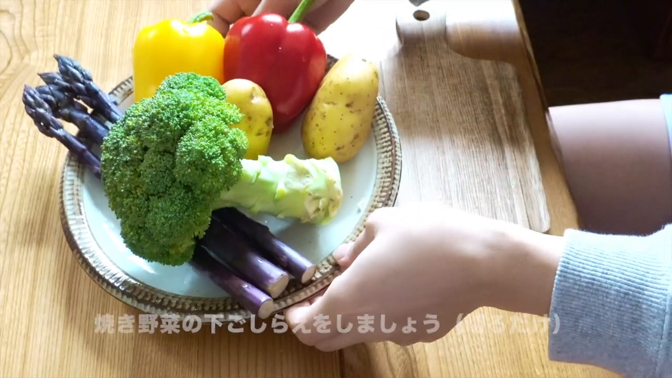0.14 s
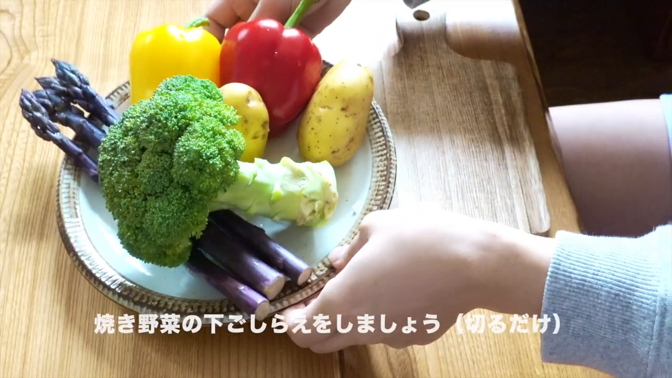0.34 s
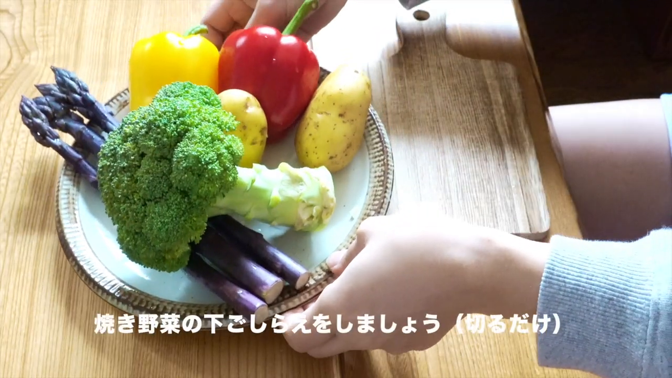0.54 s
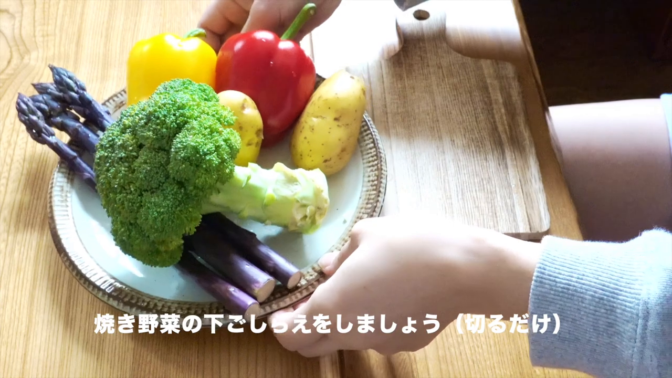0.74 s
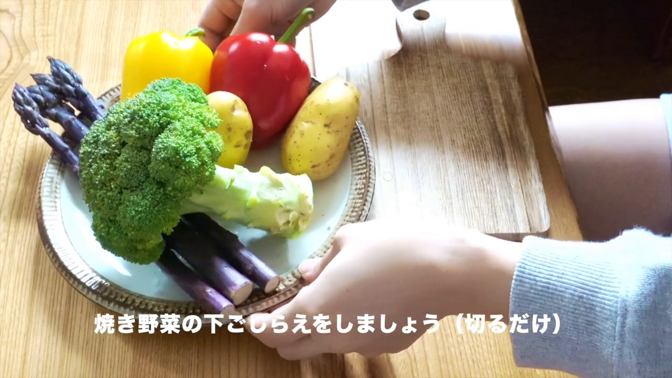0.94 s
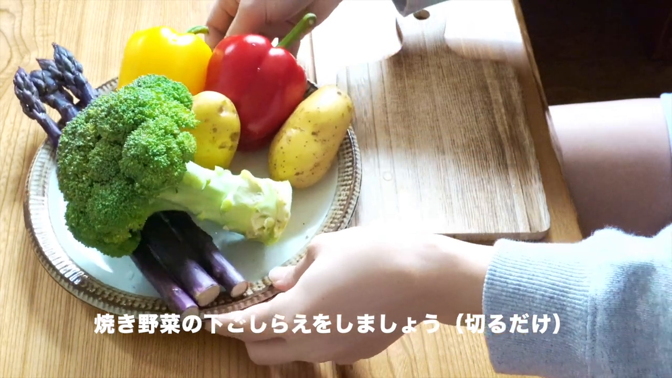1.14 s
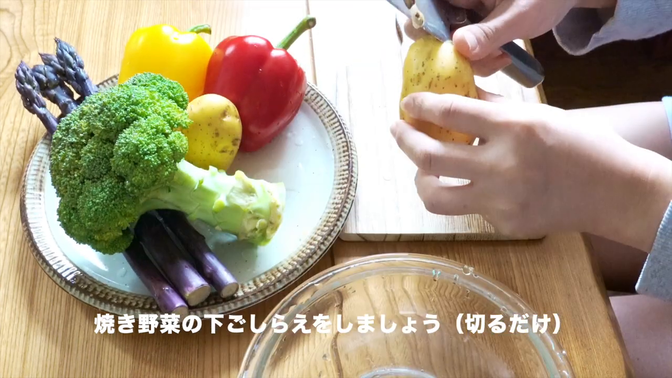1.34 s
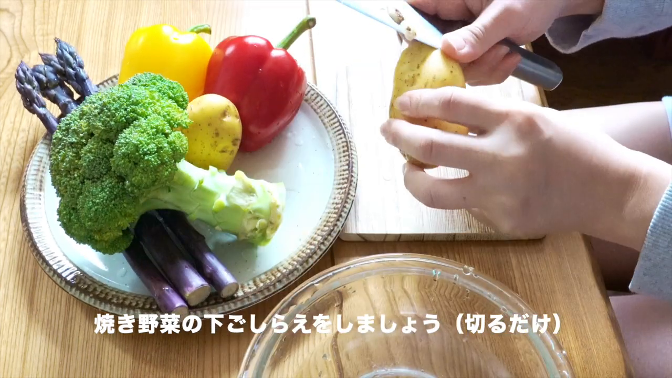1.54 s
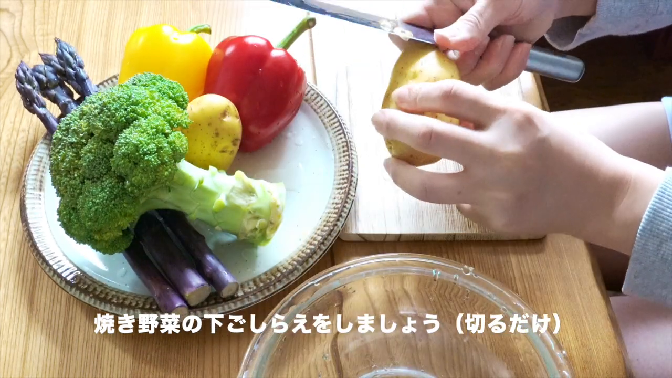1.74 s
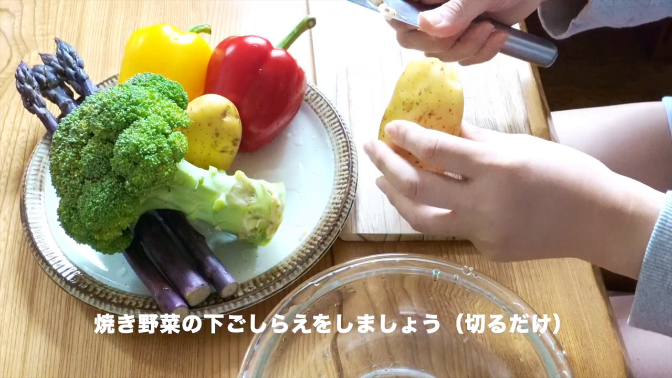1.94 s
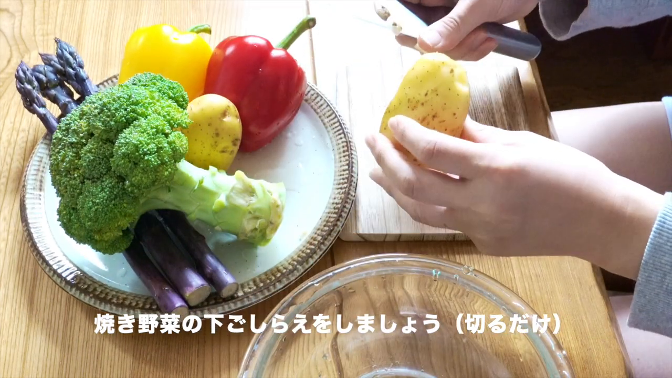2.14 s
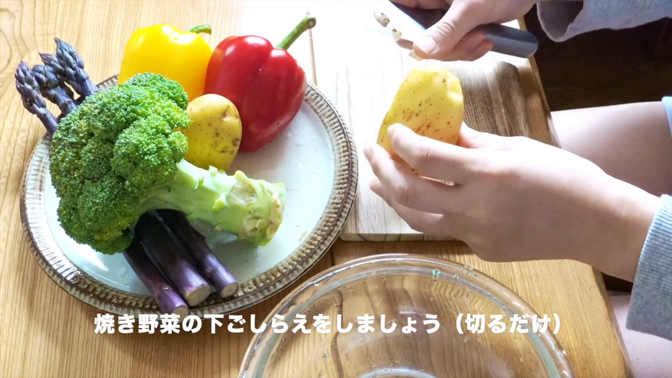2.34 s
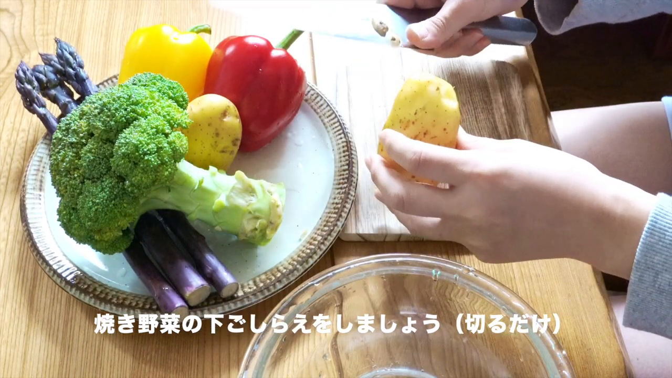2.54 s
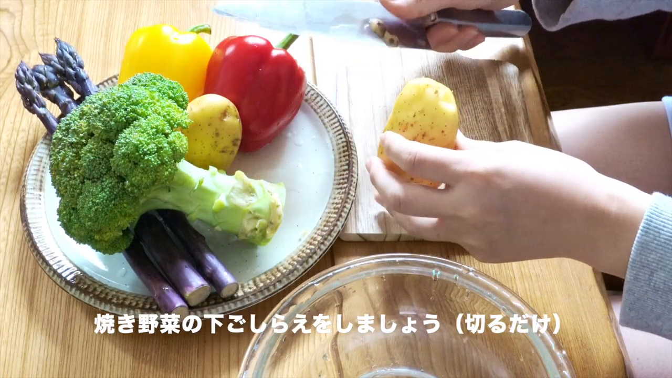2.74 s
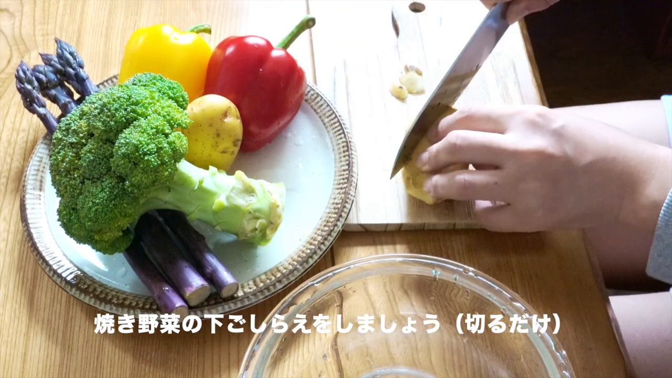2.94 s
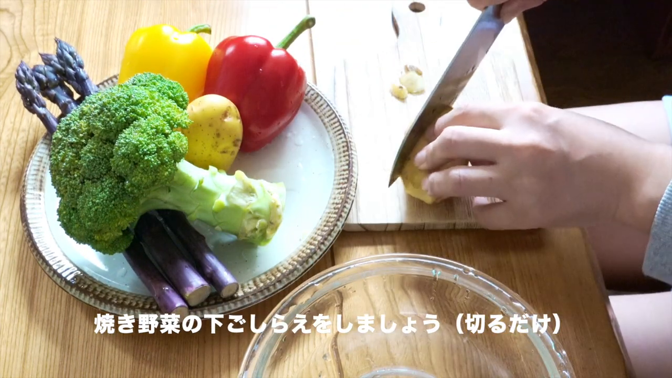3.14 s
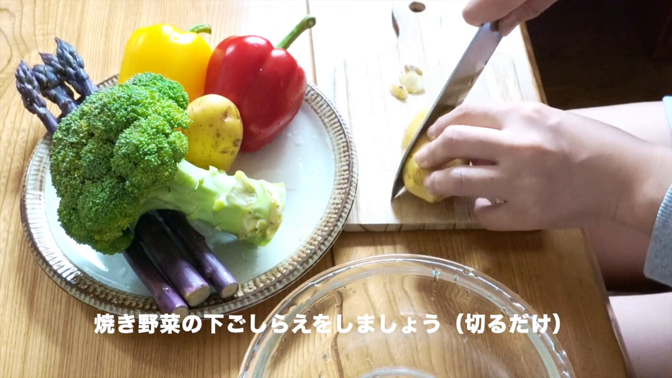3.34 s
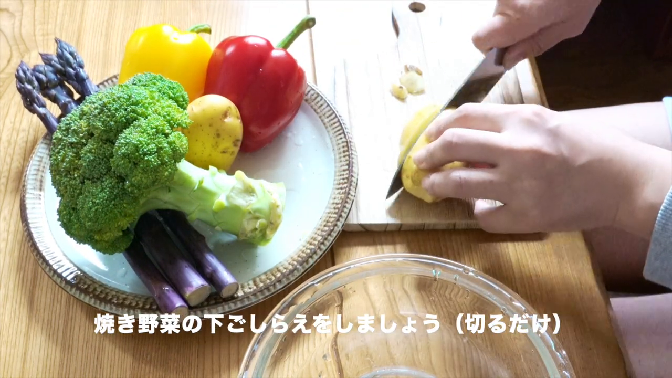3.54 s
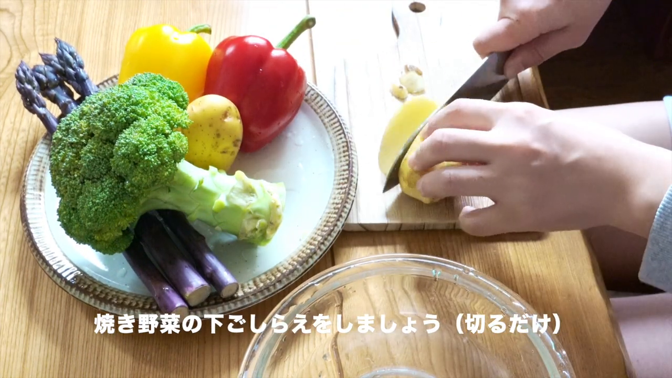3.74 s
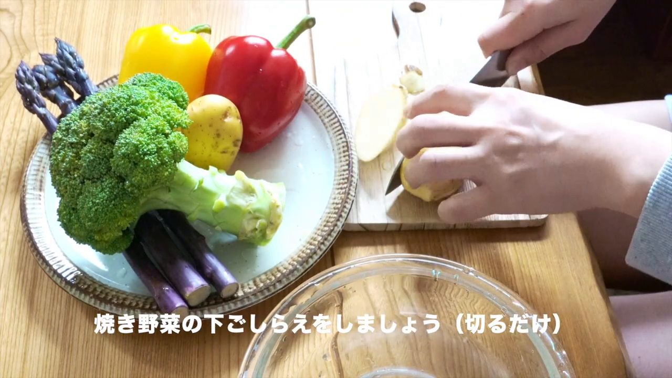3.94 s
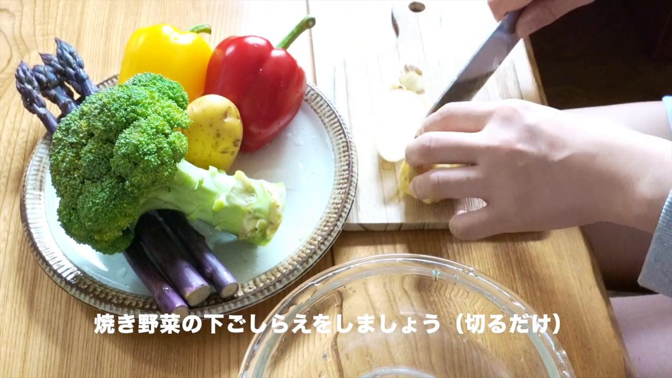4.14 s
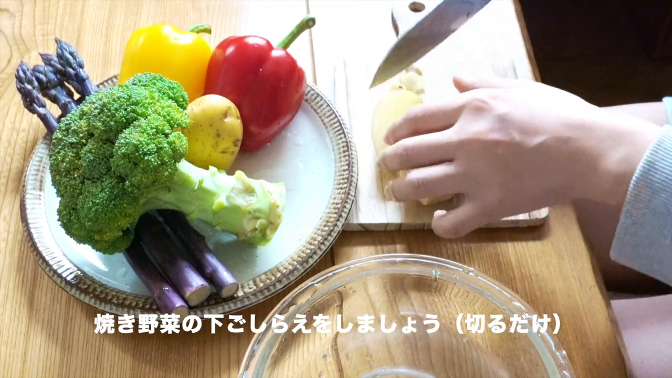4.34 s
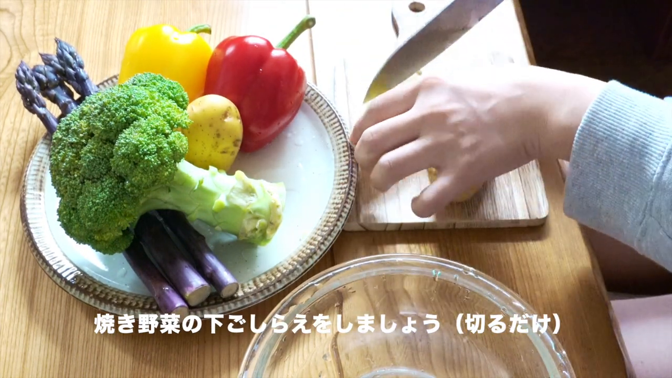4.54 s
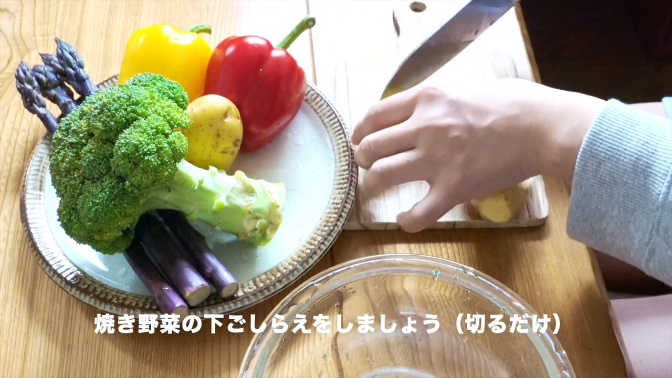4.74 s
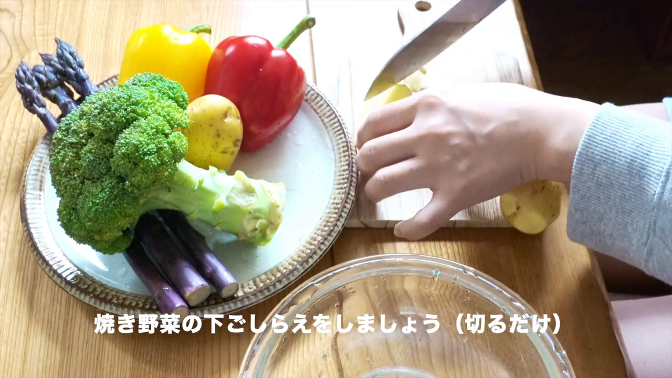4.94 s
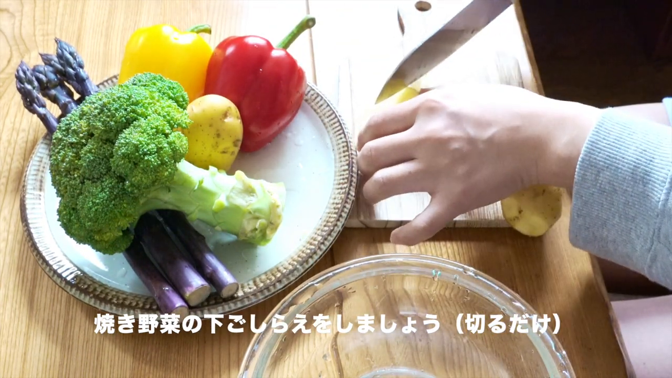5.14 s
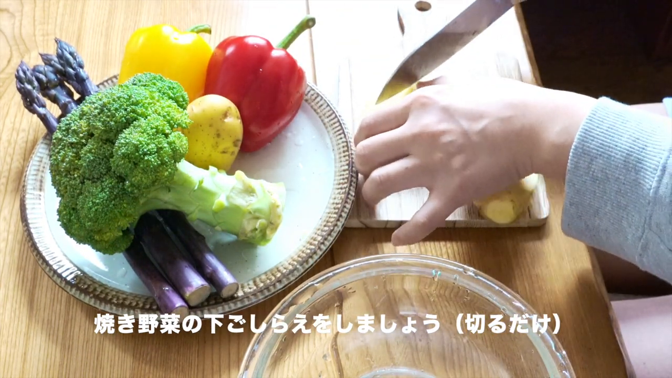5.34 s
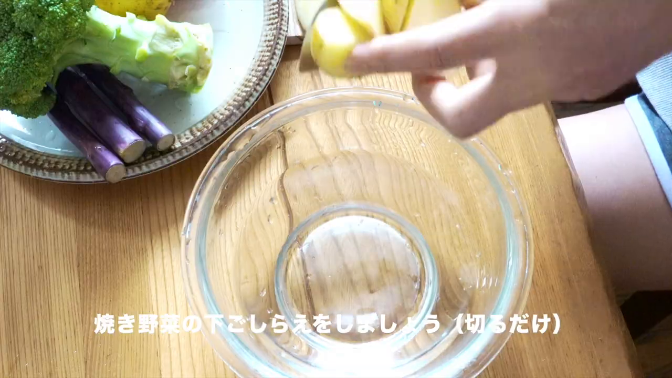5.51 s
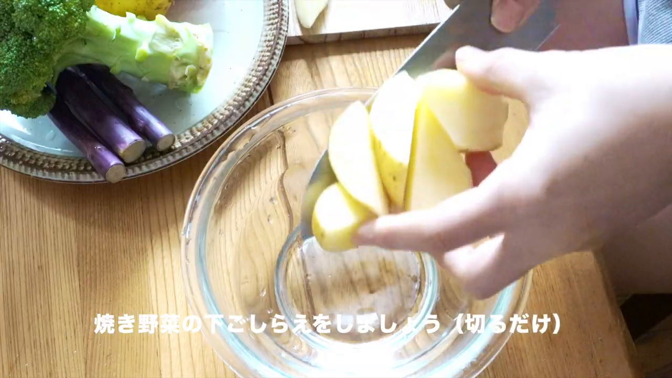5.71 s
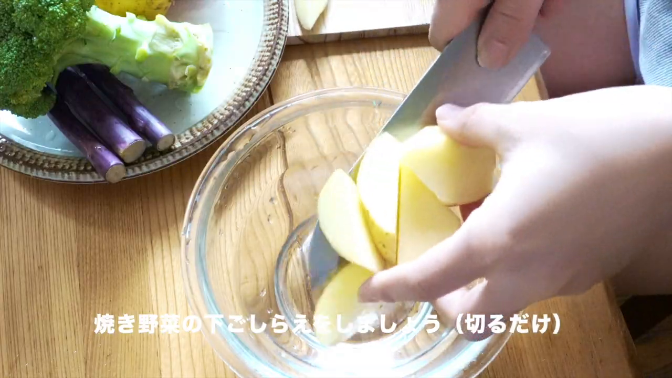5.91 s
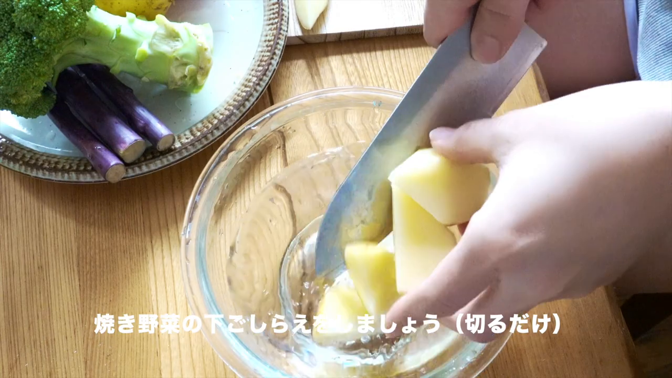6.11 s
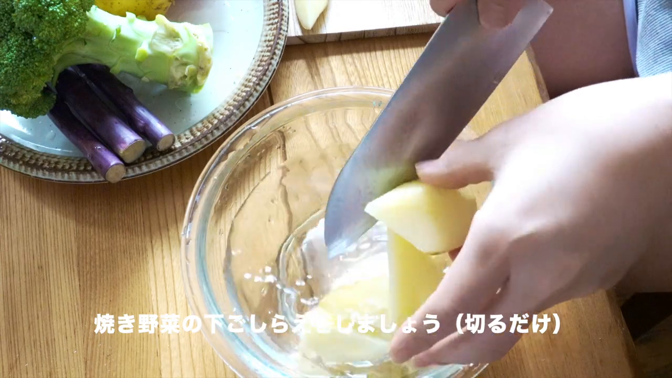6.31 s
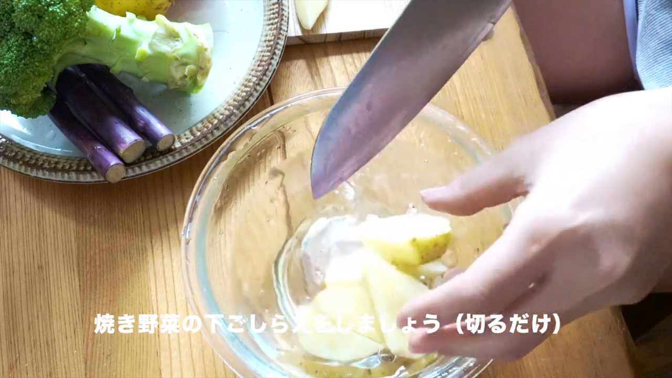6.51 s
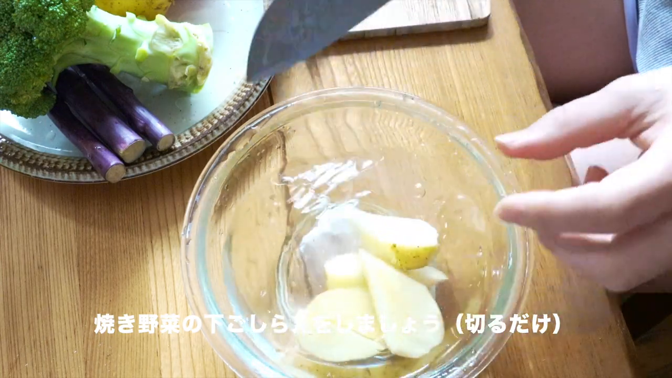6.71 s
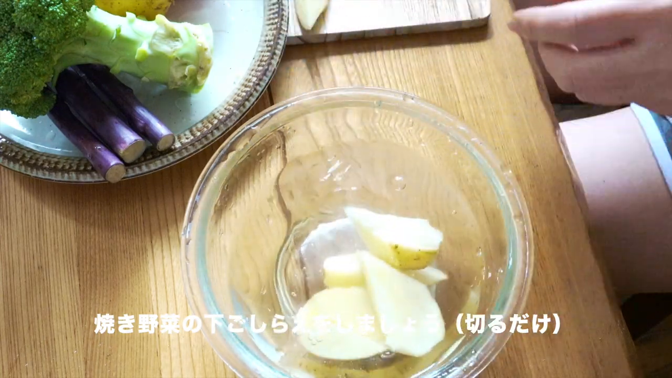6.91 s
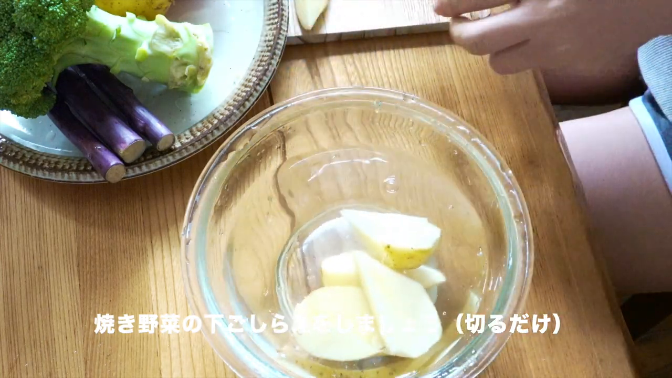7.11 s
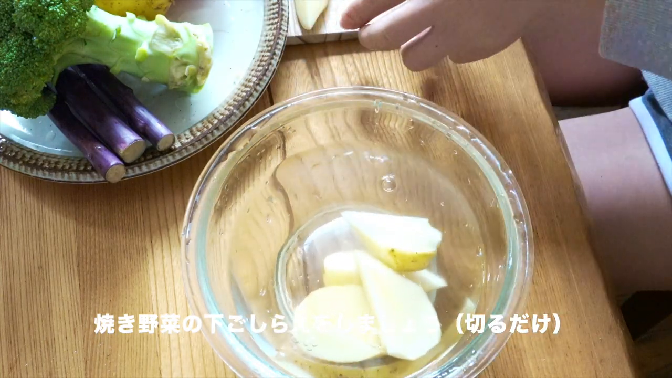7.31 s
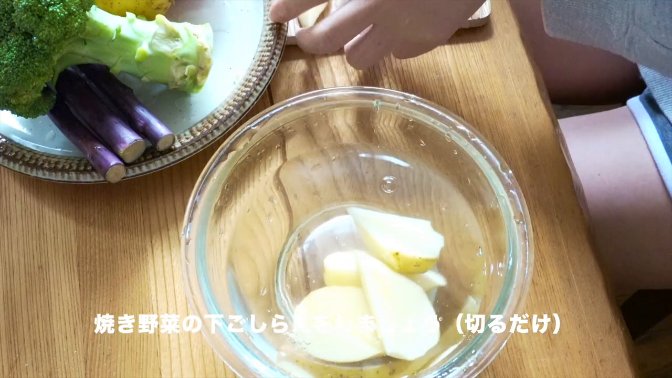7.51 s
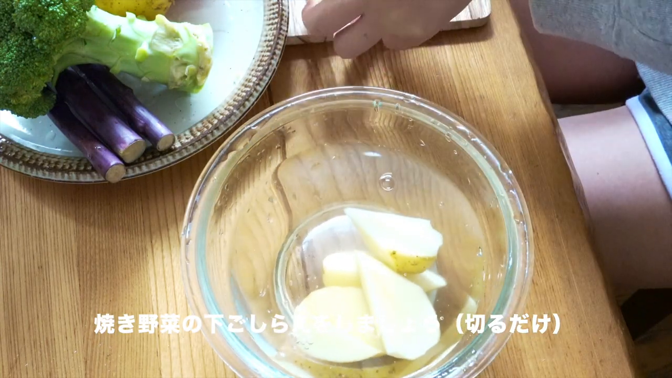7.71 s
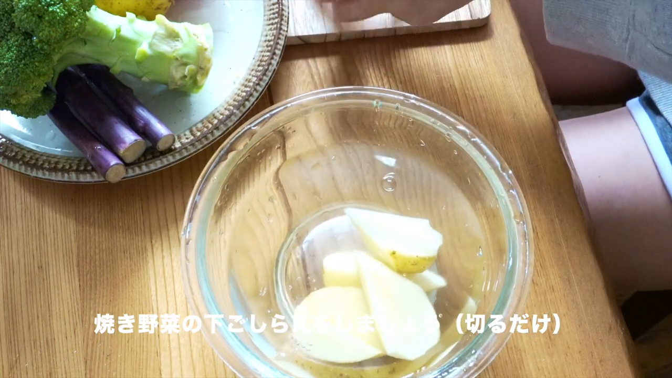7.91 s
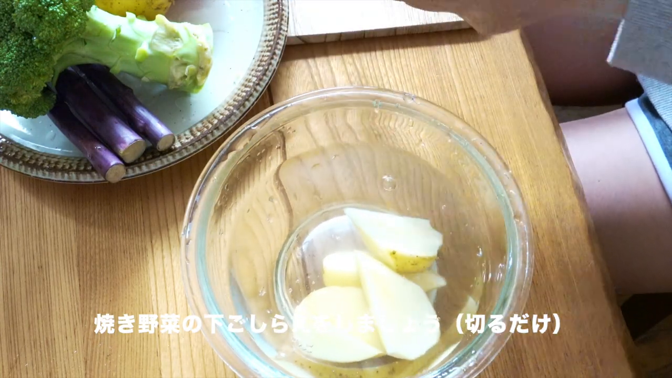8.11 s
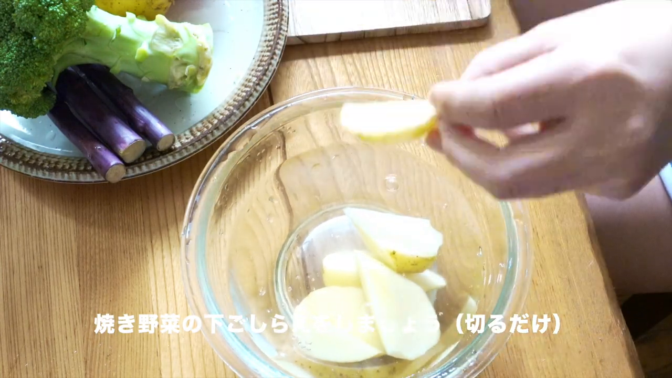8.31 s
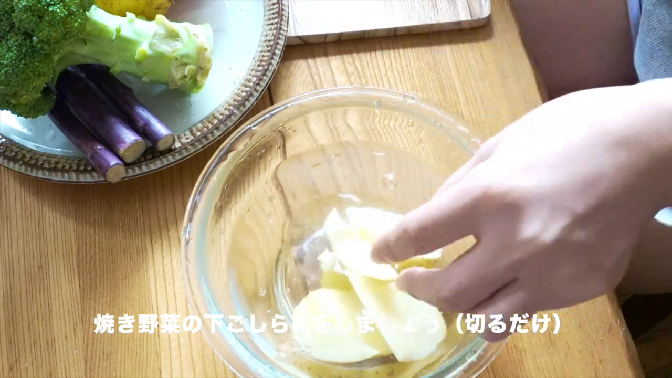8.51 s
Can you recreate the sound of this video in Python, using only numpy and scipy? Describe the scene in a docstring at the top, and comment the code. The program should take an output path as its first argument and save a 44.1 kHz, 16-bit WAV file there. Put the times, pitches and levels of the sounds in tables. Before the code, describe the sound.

A loaded ceramic plate lands and scrapes on a wooden table, then a knife trims and chops a potato and wet wedges drop into a glass bowl.

```python
"""Chopping a potato in a small kitchen

A loaded ceramic plate is set on a wooden table and pushed aside, until a cut in the sound ends its scrape.
A knife trims a potato and chops it on a board; the wet wedges are eased off the blade into a glass bowl, and
the knife is laid down. Blows are sums of decaying modes, noise bursts and clicks; cutting and scraping are
trains of random impulses, filtered and shaped by strokes or a level curve.
A small, quiet kitchen answers with diffuse stereo reflections, over a low rumble and an even hiss.
"""
import sys
import numpy as np
from scipy import signal
from scipy.fft import rfft, irfft, next_fast_len
from scipy.io import wavfile
from scipy.ndimage import uniform_filter1d

SR = 44100
rng = np.random.default_rng(int(sys.argv[2]) if len(sys.argv) > 2 else 0)


def persist_wave(psi):
    """Save psi, clipped to +-1, as 16-bit WAV."""
    counts = np.round(np.clip(psi, -1, 1) * 32767).astype(np.int16)
    wavfile.write(sys.argv[1], SR, np.atleast_2d(counts).T)


N = 381906
T = np.arange(SR // 2) / SR  # time axis of a single blow [s]

# Events. Levels are relative: each source balances its own parts.
# blade shaving skin, wet pieces rubbing: (time [s], length [s], final level [dB], swell [dB])
SHAVING_STROKES = [(1.216, 0.048, -55.5, 5), (1.315, 0.04, -48, 9), (1.408, 0.229, -44, 4.5),
                   (1.662, 0.048, -48.5, -1), (1.721, 0.052, -48.5, 10), (5.337, 0.015, -62.5, -7),
                   (5.367, 0.013, -68, 0), (5.41, 0.03, -59, 3), (6.434, 0.014, -45.5, 0)]
# blade splitting flesh, wedges sliding apart:
# (time [s], length [s], final crisp level [dB], swell [dB], flesh re crisp [dB], juice fizz re crisp [dB])
CUTTING_STROKES = [(2.869, 0.073, -55.5, 6, 1, 5.5), (2.972, 0.63, -69.5, 4.4, 5.5, 7.5),
                   (3.123, 0.015, -44.5, 1.5, -8.5, 5), (3.283, 0.036, -30.5, 12, -4.5, -3),
                   (3.468, 0.12, -32.5, 15, -8.5, -17), (7.908, 0.14, -64, 9.5, -2.5, -4),
                   (8.079, 0.054, -56, 7, -8.5, 0.5), (8.236, 0.037, -62, 3.6, -5, -3)]
# crisp snaps of potato: (time [s], level [dB], top octave [dB])
POTATO_SNAPS = [(1.3672, -35, -4), (1.411, -26.5, -2), (1.429, -42, -8), (1.4443, -36, 2), (1.581, -44, -6),
                (1.736, -23, -17), (1.775, -31, -10), (4.4721, -32.5, -26), (6.109, -28.5, -36),
                (6.1641, -23, -10.5), (6.471, -10.5, -9), (6.475, -21, -17), (6.479, -16.5, -10),
                (8.0002, -36.5, -21)]
# knife touching the board, and rocking when laid down:
# (time [s], ring level [dB], knock re ring [dB], hardness [dB per octave])
KNIFE_TOUCHES = [(4.8215, -56, -0.5, -3), (7.5135, -43, -3.5, 2), (7.5361, -40.5, -4.5, -4),
                 (7.592, -50.5, -2, -3), (7.611, -45.5, -15, 0), (7.63, -46, -0.5, -4.5)]
# dull taps as the grip changes and the edge is set on the potato: (time [s], level [dB])
KNIFE_TAPS = [(2.6217, -58), (2.879, -60.5)]
# blade gathering wedges and grazing the glass: (time [s], level [dB], most excited pitch [Hz])
BLADE_TINKS = [(5.339, -67, 4100), (5.376, -66, 4150), (5.424, -74, 4150), (5.945, -66, 4550),
               (6.012, -55.5, 8200), (6.013, -63.5, 2850), (6.104, -56.5, 2850)]
# light ticks of blade and crockery: (time [s], level [dB], pitch [Hz])
LIGHT_TICKS = [(0.711, -45, 2010), (6.021, -41.5, 7150), (6.101, -37, 2760), (6.201, -34, 2960),
               (6.208, -28.5, 3750), (6.212, -33.5, 4470), (6.222, -43, 6400), (6.371, -43, 8400),
               (6.386, -44, 8300), (6.437, -38.5, 1970), (6.444, -32, 1940)]
# plate and knife landing on the wood:
# (time [s], knock level [dB], thud re knock [dB], board ring re knock [dB], crack re knock [dB])
TABLE_BLOWS = [(0.553, -36, 3.5, -2.5, -31), (0.887, -25, -31, -6.5, -51), (0.919, -37, -32, -15, -35),
               (3.3324, -23.5, -5.5, -1, 2.5), (3.338, -28, -12, -5.5, -8), (3.502, -23, -23, 2, -6)]
# hands and potato bumping the board softly: (time [s], thud level [dB], knock re thud [dB])
SOFT_BUMPS = [(0.757, -52.5, 9), (2.895, -51, -2), (3.017, -45.5, -7.5), (3.129, -47.5, 0),
              (3.305, -42, -2), (3.799, -50.5, -26), (4.57, -47.5, -10.5), (4.608, -51, -7),
              (4.808, -55.5, -7), (4.91, -52.5, -13), (5.313, -57, -16), (5.374, -56, -9),
              (7.529, -55, -17), (8.512, -51, -12)]
# wedges and blade meeting the bowl:
# (time [s], knock level [dB], glass ring re knock [dB], clack re knock [dB], thud re knock [dB])
BOWL_DROPS = [(6.012, -30.5, -11.5, -24, -16), (6.164, -41.5, -15, -17, -20),
              (6.206, -33.5, -22, -25, -4.5), (6.218, -33, -15, -17, -19), (6.368, -43, 3.5, -4.5, -11),
              (6.408, -41.5, -41, -21, -1), (6.471, -36, -6, -38, -9.5), (6.479, -35.5, -24, -23, -26),
              (6.545, -39, 8.5, 8, -24)]
# plate creeping, giving way and being pushed on until the sound cuts away: (time [s], scrape level [dB])
PLATE_SLIDE = [(0.74, -69), (0.81, -65.5), (0.95, -64.5), (1.04, -59), (1.17, -51), (1.22, -59)]
# plate's foot meeting the table: (time [s], level [dB])
PLATE_LANDING = (0.553, -51)

# Modes: (frequency [Hz], level [dB], decay by 60 dB [s])
KNIFE_MODES = [(1584, -12.5, 0.21), (1980, -13.5, 0.13), (2630, -3, 0.18), (2710, -14, 0.11),
               (3122, -13, 0.11), (4000, -15, 0.079), (4520, -19, 0.13), (5680, -10, 0.12),
               (7555, -18, 0.13), (9540, -18, 0.15)]
LOADED_BLADE_MODES = [(2850, 1, 0.17), (4148, 0, .13), (5420, -7, .1), (6690, -1, 0.1), (8204, 8, .07),
                      (9015, -1, .06), (9700, 2, .07)]
TABLE_MODES = [(290, -17, 0.23), (321, -14, 0.23), (364.1, 6, 0.18), (396.6, 2, 0.11), (478.4, -4, 0.072)]
TABLE_LOW_MODES = [(86, -18, 0.15), (126.7, -3, 0.18), (156, -20.5, 0.22), (191.8, -11.5, 0.19),
                   (239, -19.5, 0.3)]
BOARD_MODES = [(489, 7.5, 0.066), (548, 8, 0.14), (573, -11, 0.7), (610, -14, 0.63), (627, -2, 0.14),
               (714, -2, 0.22), (810, -4, 0.27), (1030, -20, 0.37), (1098, -8, 0.082), (1164, -9, 0.38)]
BOWL_FOOT_MODES = [(224, -19, 0.28), (378, -5, 0.18), (430, 1, 0.081)]
BOWL_MODES = [(913, 6, 0.037), (994, -2, 0.18), (1900, -18, 0.14)]
# plate resonances: (frequency [Hz], width [Hz], level [dB])
PLATE_RESONANCES = [(520, 58, 1.5), (870, 34, 6), (1224, 40, -3.5), (1616, 100, -5.5), (1960, 100, -4.5),
                    (2710, 120, -14.5), (3130, 40, -3), (4270, 25, -15.5), (4730, 72, -11)]

# Spectra of the potato, clicks, bursts and background: (frequency [Hz], relative level [dB])
SKIN_SPECTRUM = [(880, -52), (1500, -32), (1670, -15), (2020, -40), (2610, -19), (4200, -20), (4730, -12.5),
                 (6760, -5.5), (10800, 0), (12000, -9.5), (16000, -6)]
CRISP_SPECTRUM = [(2500, -19), (4500, 0), (8000, 2.5), (11000, 0.5), (15500, -10.5)]
FLESH_SPECTRUM = [(200, -4), (600, -6), (1200, -3), (1700, -5.5), (2500, -0.5), (3500, -7), (6000, -18)]
FIZZ_SPECTRUM = [(6000, -35), (10000, 1), (15000, -2)]
SNAP_SPECTRUM = [(500, -43), (2000, -8.5), (3500, -9), (4800, -3), (8000, 2), (11000, 10), (13000, 9.5),
                 (15500, 6)]
TAP_SPECTRUM = [(250, -8), (950, 2), (1400, -3.5), (2400, 6), (3300, -10), (5500, -32)]
CLACK_SPECTRUM = [(300, -8), (1000, -6.5), (1900, -10), (3000, -14), (5000, -21), (12000, -23)]
CRACK_SPECTRUM = [(500, -1), (1100, 12), (1700, 5), (2600, 9.5), (3300, -4), (5000, -5.5), (12000, -7)]
WOOD_SPECTRUM = [(120, -14.5), (280, -3), (400, 2), (680, 2), (800, -0.5), (1150, -11), (1500, -29),
                 (3000, -44.5)]
THUMP_SPECTRUM = [(25, -2), (60, -7), (105, -1), (170, -8.5), (260, -18.5), (600, -41.5)]
QUIET_SPECTRUM = [(12, -39), (20, -3), (43, -9.5), (113, -4), (248, -9.5), (319, -14.5), (357, -12.5),
                  (499, -16), (574, -10), (678, -17), (1090, -18), (1190, -17.5), (1570, -22), (4670, -26),
                  (16000, -29.5)]
# stereo widths of echo and background: (frequency [Hz], side re mid [dB])
ECHO_WIDTH = [(100, -52), (250, -32), (500, -14.5), (1000, -6), (2000, -9), (4000, 3), (12000, 1.5)]
BACKGROUND_WIDTH = [(60, -16), (110, -19), (200, -6.5), (380, -3.5), (700, -3.5), (1290, 0), (2380, 1.5),
                    (4400, 1), (8120, 0.5), (15000, 0)]
# reverberation time of the kitchen: (frequency [Hz], decay by 60 dB [s])
KITCHEN_DECAY = [(150, 0.69), (380, 0.44), (1000, 0.56), (5000, 0.44), (14000, 0.33)]
# reverberation level: (frequency [Hz], room re direct [dB])
ECHO_LEVEL = [(150, -0.5), (380, -5), (650, -1.5), (1000, -2.5), (2000, -3.5), (6000, -6), (14000, -7)]

SHAVE_ATTACK_S, SHAVE_RELEASE_S = 0.0051, 0.039  # skin catches at once; a release is a fall of 60 dB
CUT_ATTACK_S, CUT_RELEASE_S = 0.017, 0.1  # the edge sinks in, then breaks free
FOCUS_DB_PER_OCTAVE = 10  # blade modes away from the contact's pitch are weaker
SCATTER_DB = 2  # standard deviation of mode strength from blow to blow
RADIATE_HZ = 74  # the table top is too small to radiate deep bass
SCRAPE_CUT_S = 1.211  # the sound cuts away from the plate's scrape and its echo
QUIET_DB = -64  # rms of the background
TOP_HZ = 16200  # band limit of the recorder


def potato():
    """Brittle fracture: cells burst as clumped crackle in skin, a dense crunch in flesh, and single snaps."""
    crackle = grains(per_second=3500, spread_db=4) * clumps(per_second=380, depth_db=2.6)
    # a 60 dB decay time is turned into a resonance width
    blade = [(hz, np.log(1000) / (np.pi * t60), db) for hz, db, t60 in KNIFE_MODES]
    steel = resonant(crackle, blade)  # the blade sings along faintly
    shaving, cutting, crushing, fizzing = np.zeros((4, N))
    for s, length, db, swell_db in SHAVING_STROKES:
        shaving += amp(db) * stroke(s, length, swell_db, SHAVE_ATTACK_S, SHAVE_RELEASE_S)
    for s, length, db, swell_db, flesh_db, fizz_db in CUTTING_STROKES:
        push = amp(db) * stroke(s, length, swell_db, CUT_ATTACK_S, CUT_RELEASE_S)
        cutting += push
        crushing += amp(flesh_db) * push
        fizzing += amp(fizz_db) * push
    skin = patchy(coloured(crackle, SKIN_SPECTRUM), depth_db=3.5)
    shave = shaving * (unit(skin) + amp(-24) * unit(steel))
    crisp = cutting * unit(coloured(grains(per_second=6700, spread_db=6.5), CRISP_SPECTRUM))
    flesh = crushing * unit(coloured(grains(per_second=6000, spread_db=-1), FLESH_SPECTRUM))
    fizz = fizzing * unit(coloured(grains(per_second=13000, spread_db=2), FIZZ_SPECTRUM))
    out = amp(-0.5) * shave + amp(-4.5) * crisp + amp(-1) * flesh + amp(-4.5) * fizz
    for s, db, top_db in POTATO_SNAPS:
        # sharper breaks reach higher
        snap = coloured(crack(SNAP_SPECTRUM, t60=0.013), [(9000, 0), (14000, top_db + 1.5)])
        add(out, s, amp(db - 14.5) * snap)
    return out


def knife():
    """Modal excitation: contacts ring the blade and knock the wood; light touches tap, tink and tick."""
    out = np.zeros(N)
    for s, db, knock_db, hardness in KNIFE_TOUCHES:
        # a hard touch favours high modes
        modes = [(hz, mode_db + hardness * np.log2(hz), t60) for hz, mode_db, t60 in KNIFE_MODES]
        handle = amp(-11.5) * ring(TABLE_MODES, attack=0.0025) + amp(-11) * wood()
        steel = amp(-14.5) * ring(modes, attack=0.00031) + amp(-33) * burst(CLACK_SPECTRUM, t60=0.061)
        add(out, s, amp(db) * (steel + amp(knock_db) * handle))
        for delay in rng.uniform(0.003, 0.018, size=3):  # the blade chatters
            add(out, s + delay, amp(db - 18.5) * ring(modes, attack=0.00037))
    for s, db in KNIFE_TAPS:
        add(out, s, amp(db) * crack(TAP_SPECTRUM, t60=0.01))
    for s, db, pitch in BLADE_TINKS:
        modes = [(hz, mode_db - FOCUS_DB_PER_OCTAVE * abs(np.log2(hz / pitch)), t60)
                 for hz, mode_db, t60 in LOADED_BLADE_MODES]
        add(out, s, amp(db) * ring(modes, attack=0.00026))
    for s, db, hz in LIGHT_TICKS:
        click = burst([(hz / 4, -24), (hz * 0.97, 0), (hz * 2.2, -22)], t60=0.029)
        tone = ring([(hz, 0, 0.04)], attack=0.00044)
        add(out, s, amp(db - 14.5) * (click + amp(-11.5) * tone))
    return out


def table():
    """Impact on a plate of wood: hard blows ring the table top with a crack; soft bumps mostly sway it."""
    out = np.zeros(N)
    for s, db, thud_db, board_db, crack_db in TABLE_BLOWS:
        top = amp(-3.5) * ring(TABLE_MODES, attack=0.0018, detune=0.013)
        knock = top + amp(board_db - 7.5) * wood()
        thud = amp(thud_db - 7.5) * ring(TABLE_LOW_MODES, attack=0.0049)
        click = amp(crack_db - 9.5) * crack(CRACK_SPECTRUM, t60=0.013)
        add(out, s, amp(db) * (knock + thud + click))
    for s, db, knock_db in SOFT_BUMPS:
        sway = amp(-10) * ring(TABLE_LOW_MODES, attack=0.0013) * amp(-60 * T / 0.21)  # extra damping
        thud = sway + amp(-3.5) * burst(THUMP_SPECTRUM, t60=0.2)
        knock = amp(knock_db - 7) * ring(TABLE_MODES, attack=0.013)
        add(out, s, amp(db) * (thud + knock))
    return out


def bowl():
    """Coupled impact: soft wedges knock the bowl against the table and ring its lowest glass modes."""
    out = np.zeros(N)
    for s, db, glass_db, clack_db, thud_db in BOWL_DROPS:
        foot = amp(-10) * ring(BOWL_FOOT_MODES, attack=0.00085, detune=0.029)
        knock = foot + amp(-19) * burst(WOOD_SPECTRUM, t60=0.028)
        glass = amp(glass_db - 10) * ring(BOWL_MODES, attack=0.00022)
        thud = amp(thud_db - 7.5) * ring(TABLE_LOW_MODES, attack=0.0045) * amp(-60 * T / 0.23)
        clack = amp(clack_db - 13) * crack(CLACK_SPECTRUM, t60=0.007)
        add(out, s, amp(db) * (knock + glass + thud + clack))
    return out


def plate():
    """Stick-slip friction: the foot ring lands, then catches on the grain and excites the plate's resonances."""
    slips = grains(per_second=2700, spread_db=4) * clumps(per_second=150, depth_db=2)
    rasp = coloured(slips, [(150, -18), (450, -2), (900, 14), (2000, -12), (3200, -14), (4000, -37), (9000, -26)])
    ceramic = resonant(slips, PLATE_RESONANCES)
    out = level_curve(PLATE_SLIDE) * (amp(1) * unit(ceramic) + amp(-0.5) * unit(rasp))
    s, db = PLATE_LANDING
    contact = coloured(signal.unit_impulse(len(T)), [(800, 1), (3000, 1), (5000, -2)])
    add(out, s, amp(db) * struck(resonant(contact, PLATE_RESONANCES)))
    return out


def wood():
    """Modal density: a struck board has a few clear upper modes among many crowded ones."""
    clear = ring(BOARD_MODES, attack=0.00049, detune=0.0046)
    return amp(-8.5) * clear + burst(WOOD_SPECTRUM, t60=0.11)


def ring(modes, attack, detune=0):
    """Modal decay: each blow meets the modes at slightly new strengths, and a shifting load detunes them."""
    hz, db, t60 = np.transpose(modes)[:, :, None]
    gain = amp(db + SCATTER_DB * rng.standard_normal(hz.shape) - 60 * T / t60)
    hz = hz * (1 + detune * rng.standard_normal(hz.shape))
    total = (gain * np.cos(2 * np.pi * hz * T)).sum(axis=0)
    return struck(total * (1 - np.exp(-T / attack)))


def burst(spectrum, t60):
    """High modal overlap: decaying coloured noise stands for many crowded modes that die together."""
    noise = rng.standard_normal(len(T)) * amp(-60 * T / t60)
    return struck(coloured(noise, spectrum))


def crack(spectrum, t60):
    """Broadband impulse: a short toneless click, made even across frequency before it is coloured."""
    decay = amp(-60 * T / t60)
    phase = np.angle(rfft(rng.standard_normal(len(T)) * decay))
    even = irfft(np.exp(1j * phase), len(T))
    return struck(coloured(even * np.sqrt(decay), spectrum))


def grains(per_second, spread_db):
    """Shot noise: tiny fractures or slips at random moments and of uneven size, rms 1."""
    sizes = amp(spread_db * np.clip(rng.standard_normal(N), -2, 2)) * rng.choice([-1, 1], N)
    return unit(sizes * (rng.random(N) < per_second / SR))


def clumps(per_second, depth_db):
    """Stick-slip modulation: the random gain of a contact that catches and slips by turns."""
    knots = np.clip(rng.standard_normal(N), -2, 2)
    wander = np.interp(np.arange(N) * per_second / SR, np.arange(N), knots)
    return amp(depth_db * wander)


def stroke(s, length, swell_db, attack, release):
    """Force envelope: a stroke bites, changes by its swell as the hand bears down, and lets go."""
    t = np.arange(N) / SR - s
    pressure_db = swell_db * (np.clip(t / length, 0, 1) - 1)
    release_db = -60 * np.maximum(t - length, 0) / release
    return np.clip(t / attack, 0, 1) * amp(pressure_db + release_db)


def patchy(x, depth_db):
    """Time-varying filtering: the colour of a rub shifts as the contact point moves."""
    z = signal.stft(x, nperseg=256)[2]
    field = uniform_filter1d(rng.standard_normal(z.shape), size=9, axis=0)  # smooth over frequency
    field = uniform_filter1d(field, size=5, axis=1)  # then over time
    return signal.istft(z * amp(depth_db * unit(field)), nperseg=256)[1][:len(x)]


def resonant(x, peaks):
    """Parallel resonance: second-order band-passes given as (frequency [Hz], width [Hz], level [dB])."""
    def response(f):
        total = 0
        for k, (centre, width, db) in enumerate(peaks):
            damping = 1j * f * width
            # successive peaks alternate in sign
            total = total + (-1) ** k * amp(db) * damping / (centre * centre - f * f + damping)
        return total
    return filtered(x, response)


def coloured(x, spectrum, size=2048):
    """Minimum-phase filtering: a causal filter is built from the given spectrum by folding its cepstrum."""
    cepstrum = irfft(np.log(amp(along(spectrum, np.fft.rfftfreq(size, 1 / SR)))))
    cepstrum[1:size // 2] *= 2
    cepstrum[size // 2 + 1:] = 0
    impulse = irfft(np.exp(rfft(cepstrum)))
    return signal.fftconvolve(x, impulse)[:len(x)]


def filtered(x, response):
    """Linear filtering: the spectrum of x times a response of frequency, padded against wrap-around."""
    n = x.shape[-1]
    m = next_fast_len(n + SR // 4)
    return irfft(rfft(x, m) * response(np.fft.rfftfreq(m, 1 / SR)), m)[..., :n]


def along(points, hz):
    """Logarithmic interpolation of (frequency [Hz], value) points."""
    f, v = np.transpose(points)
    return np.interp(np.log(hz + 1), np.log(f + 1), v)


def level_curve(rows):
    """Level envelope: the gain of a (time [s], level [dB]) curve, practically silent outside it."""
    s, db = np.transpose(rows)
    curve_db = np.interp(np.arange(N) / SR, s, db, left=-150, right=-150)
    return uniform_filter1d(amp(curve_db), size=180)


def amp(db):
    """Amplitude ratio of a level in decibels."""
    return 10 ** (np.asarray(db) / 20)


def unit(x):
    """Power normalisation to rms 1."""
    return x / np.sqrt(np.mean(x ** 2) + 1e-20)


def struck(x):
    """Onset normalisation: the first 10 ms of a blow have rms 1."""
    return x / np.sqrt(np.mean(x[:SR // 100] ** 2) + 1e-20)


def add(track, s, sound):
    """Superposition of a sound on the track from time s."""
    part = track[round(s * SR):][:len(sound)]
    part += sound[:len(part)]


def diffuse(pair, width):
    """Decorrelation: two unrelated sounds become mid and side, and so left and right."""
    side = filtered(pair[1], lambda hz: amp(along(width, hz)))
    return np.array([pair[0] + side, pair[0] - side])


def kitchen(x):
    """Reverberation: diffuse reflections from walls and cupboards decay at a rate set by frequency."""
    hz, t, z = signal.stft(rng.standard_normal((2, len(T))), SR, nperseg=256)
    t60 = along(KITCHEN_DECAY, hz)[:, None]
    decay = amp(along(ECHO_LEVEL, hz)[:, None] - 60 * t / t60)
    equal_energy = np.sqrt(2 * np.log(1000) / (t60 * SR))  # offsets the energy of longer tails
    tail = signal.istft(z * decay * equal_energy, SR, nperseg=256)[1][:, :len(T)]
    tail = tail * (1 - np.exp(-T / 0.0007))
    return signal.fftconvolve(x[None], diffuse(tail, ECHO_WIDTH), axes=1)[:, :N]


def background():
    """Stationary noise: filtered Gaussian noise gives a low room rumble and an even hiss."""
    air = filtered(rng.standard_normal((2, N)), lambda hz: amp(along(QUIET_SPECTRUM, hz)))
    return amp(QUIET_DB) * unit(diffuse(air, BACKGROUND_WIDTH))


def scene():
    """Superposition: central sources, echo and quiet; a cut in the sound ends the scrape together with its echo."""
    high_pass = signal.butter(2, RADIATE_HZ, "high", fs=SR, output="sos")
    knocks = signal.sosfilt(high_pass, table() + bowl())
    direct = knocks + potato() + knife()
    scrape = plate()
    before_cut = uniform_filter1d((np.arange(N) < SCRAPE_CUT_S * SR) * 1., size=220)
    return direct + kitchen(direct) + before_cut * (scrape + kitchen(scrape)) + background()


def record(dry):
    """Band limitation: the recorder keeps nothing above its band limit."""
    return filtered(dry, lambda hz: hz < TOP_HZ)


dry = scene()
out = record(dry)
persist_wave(out)
```